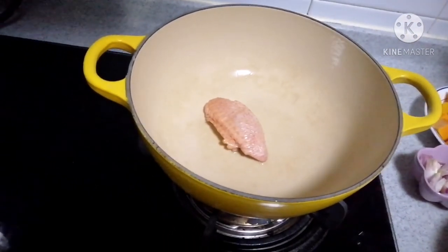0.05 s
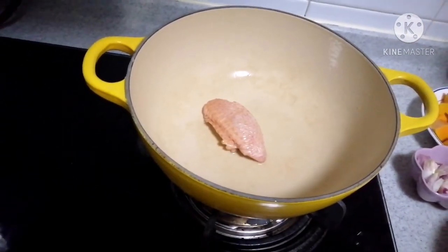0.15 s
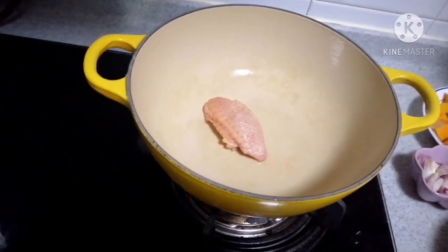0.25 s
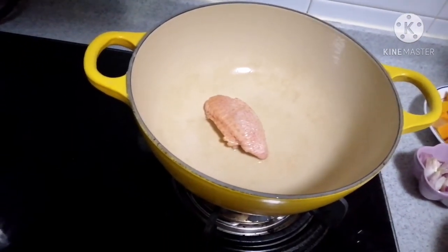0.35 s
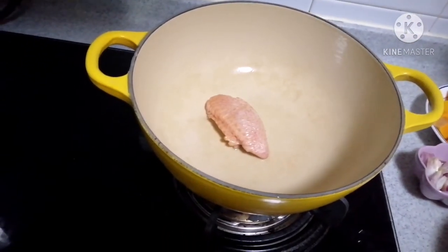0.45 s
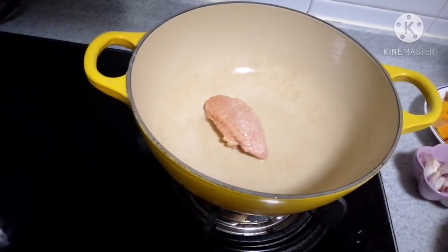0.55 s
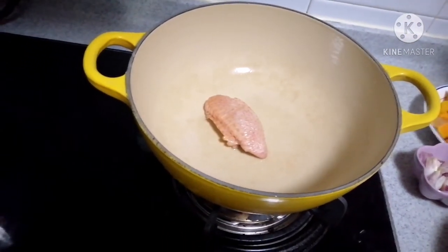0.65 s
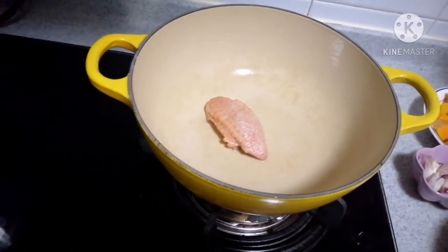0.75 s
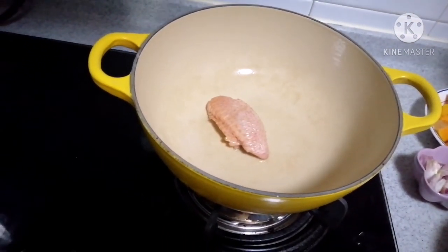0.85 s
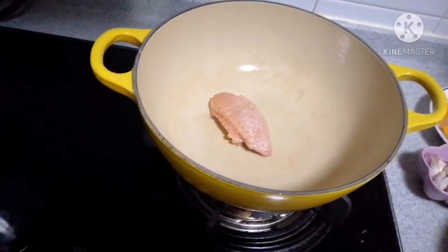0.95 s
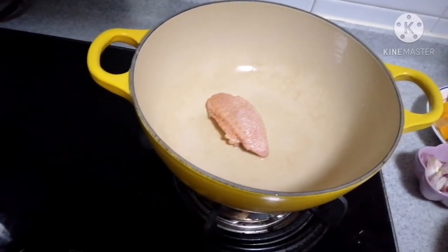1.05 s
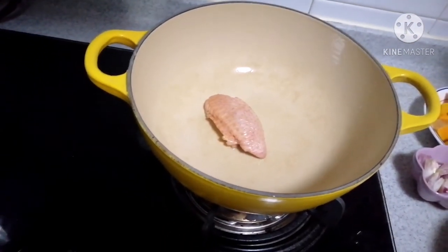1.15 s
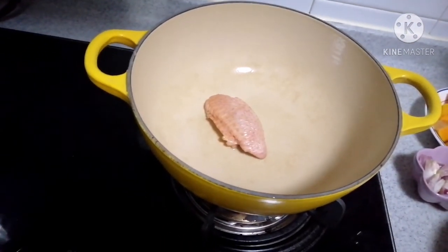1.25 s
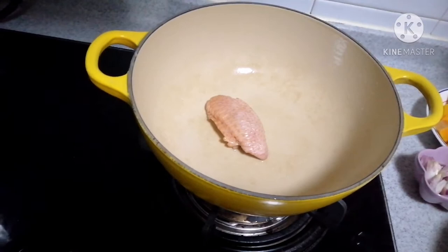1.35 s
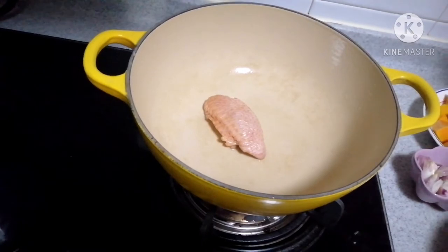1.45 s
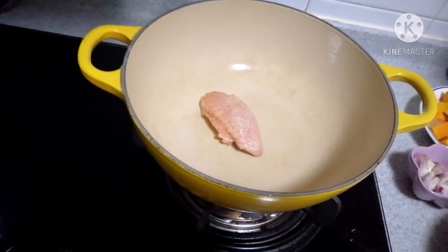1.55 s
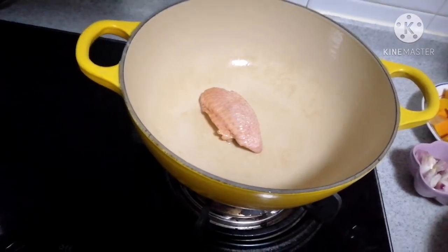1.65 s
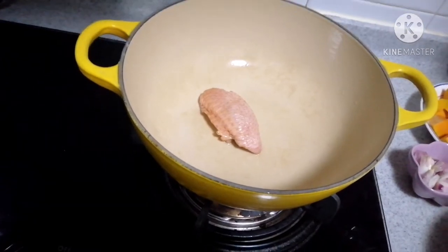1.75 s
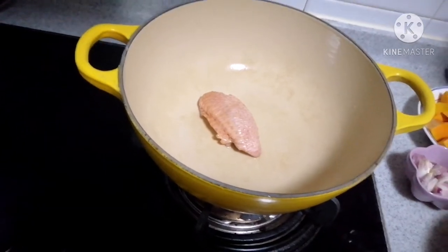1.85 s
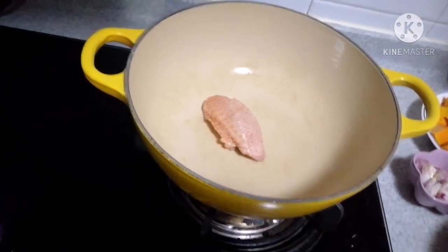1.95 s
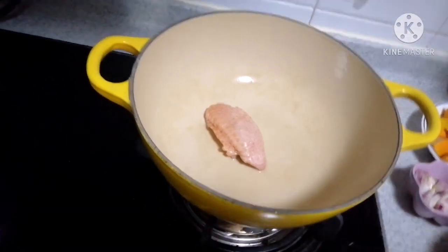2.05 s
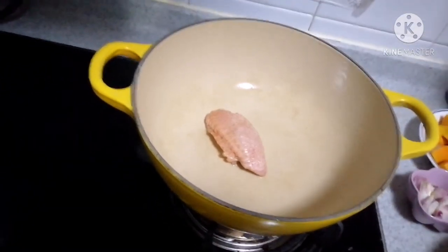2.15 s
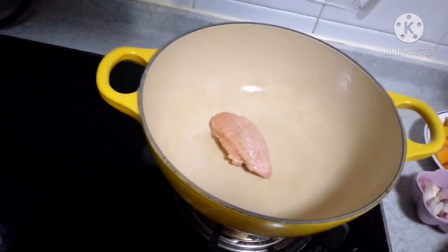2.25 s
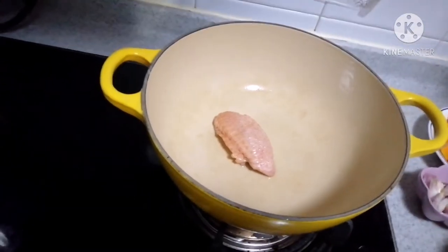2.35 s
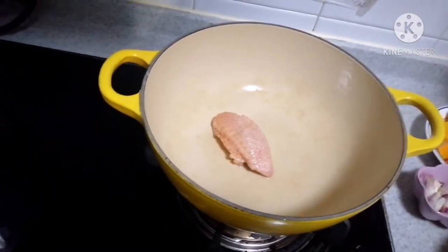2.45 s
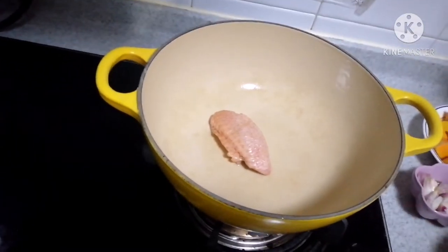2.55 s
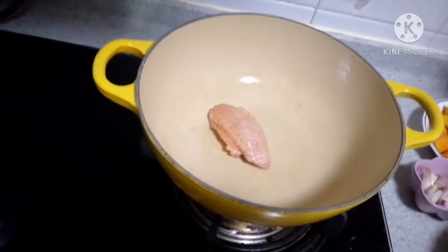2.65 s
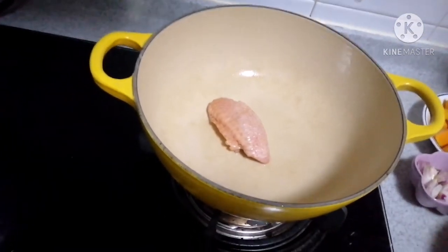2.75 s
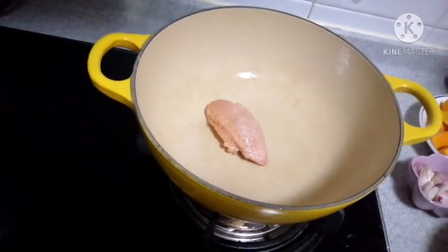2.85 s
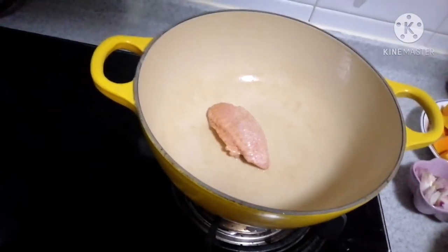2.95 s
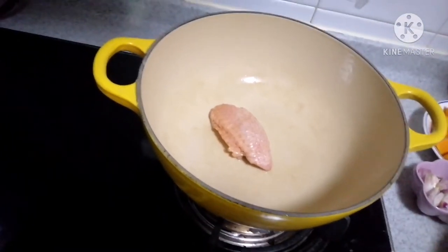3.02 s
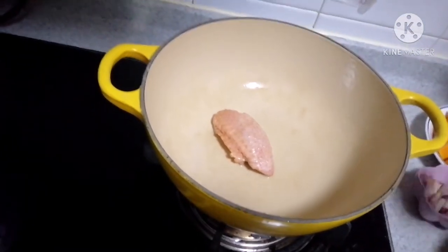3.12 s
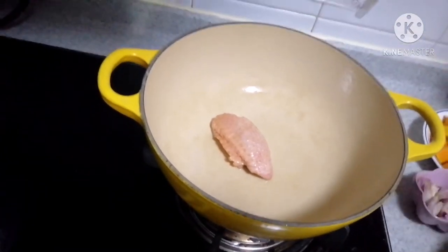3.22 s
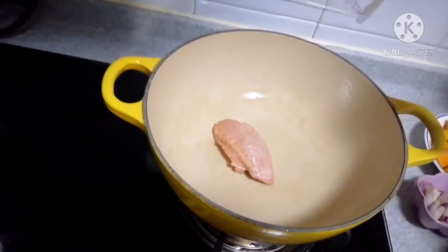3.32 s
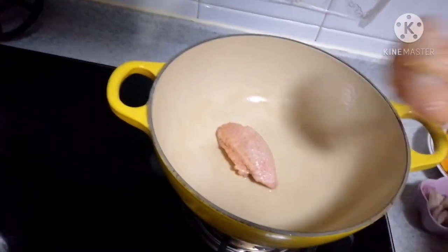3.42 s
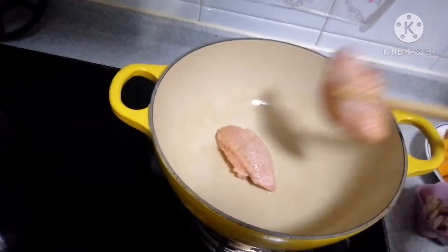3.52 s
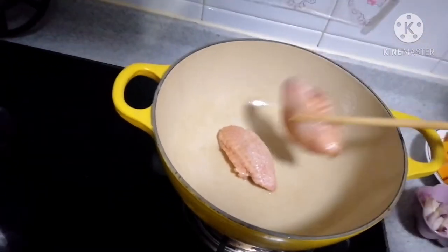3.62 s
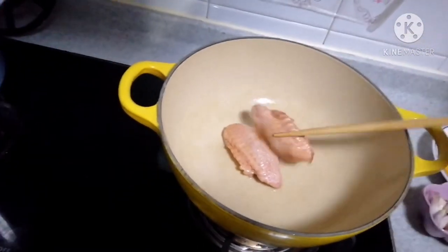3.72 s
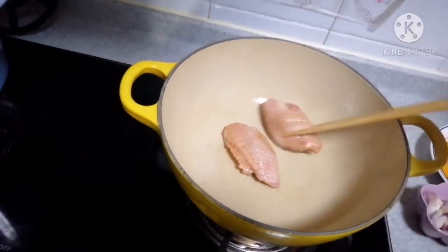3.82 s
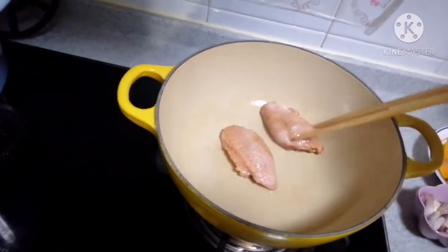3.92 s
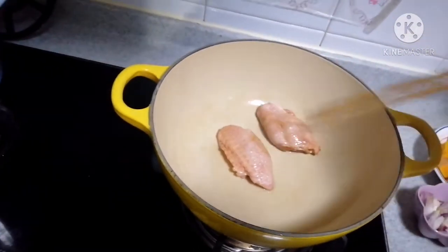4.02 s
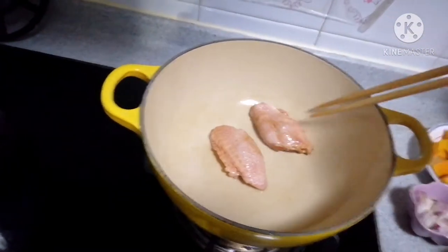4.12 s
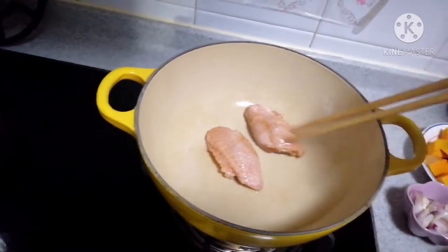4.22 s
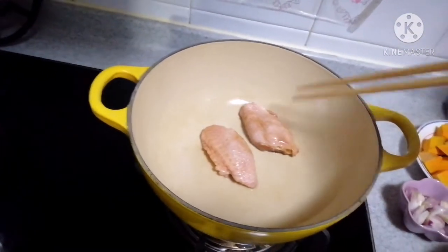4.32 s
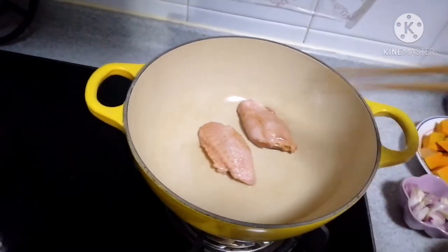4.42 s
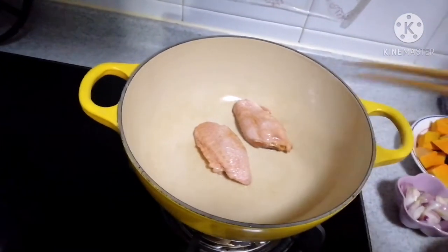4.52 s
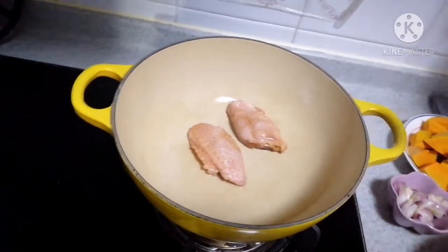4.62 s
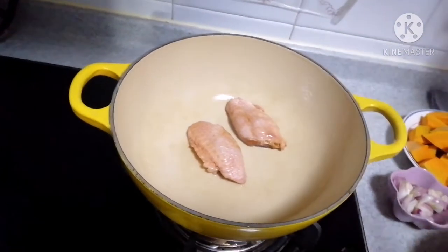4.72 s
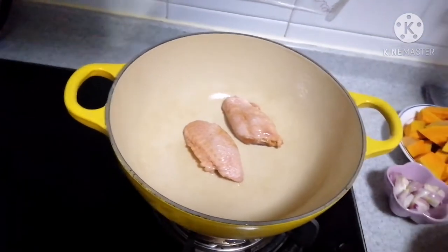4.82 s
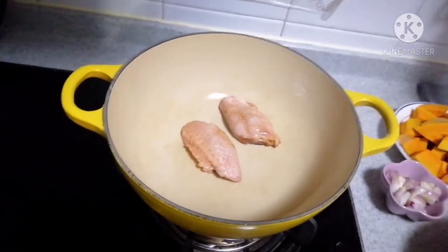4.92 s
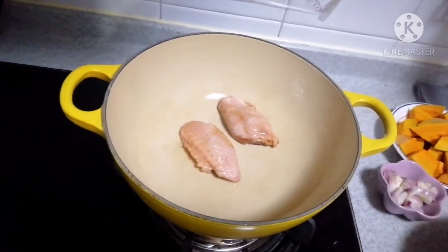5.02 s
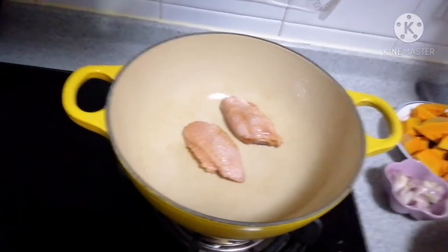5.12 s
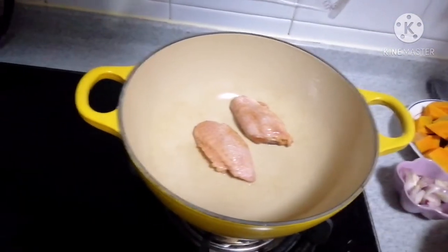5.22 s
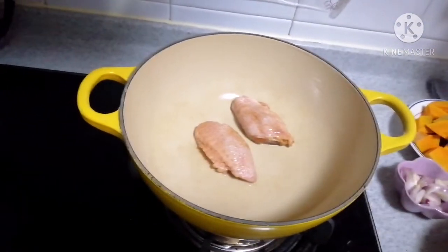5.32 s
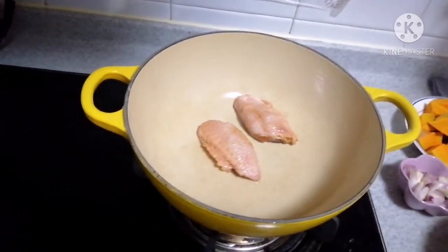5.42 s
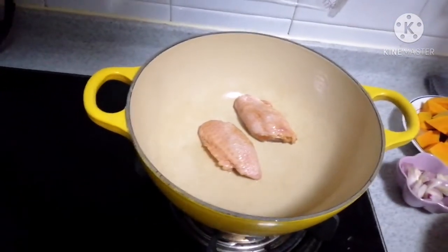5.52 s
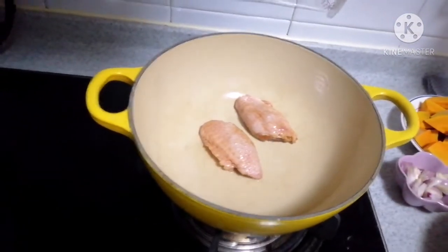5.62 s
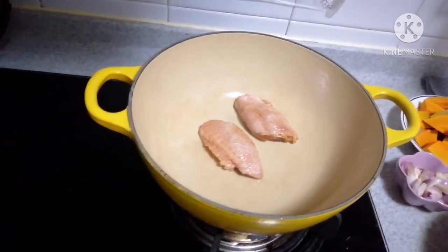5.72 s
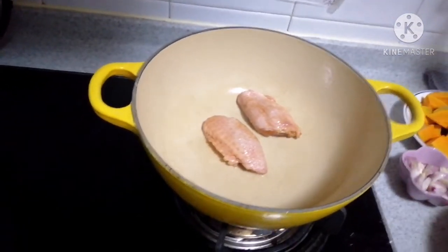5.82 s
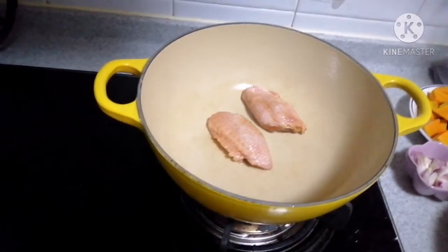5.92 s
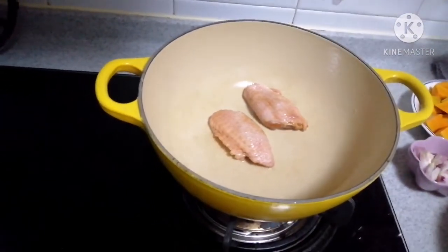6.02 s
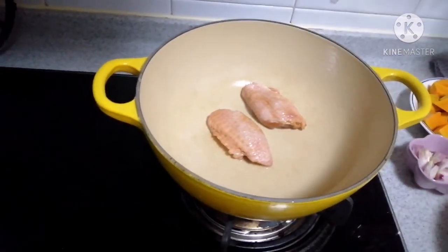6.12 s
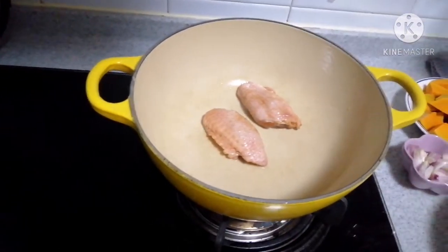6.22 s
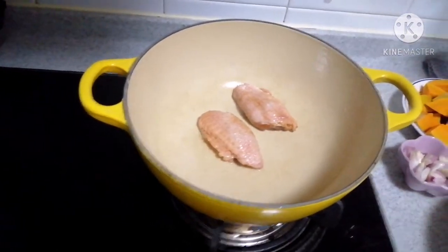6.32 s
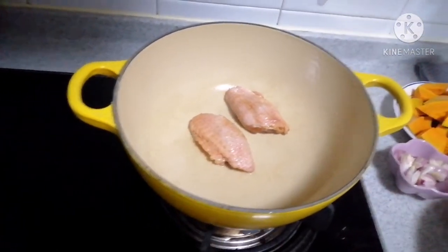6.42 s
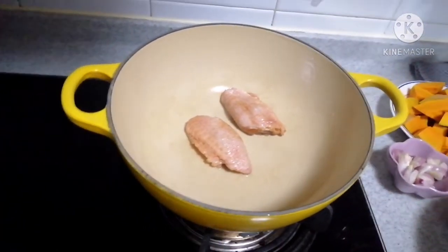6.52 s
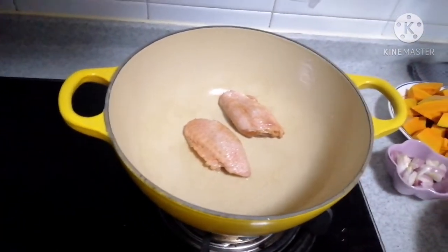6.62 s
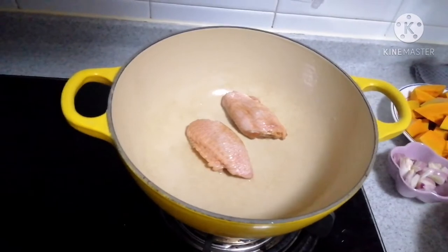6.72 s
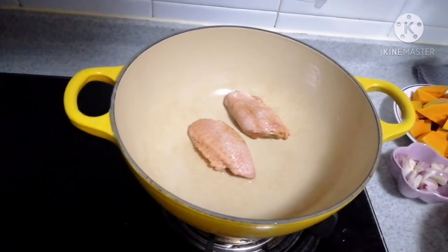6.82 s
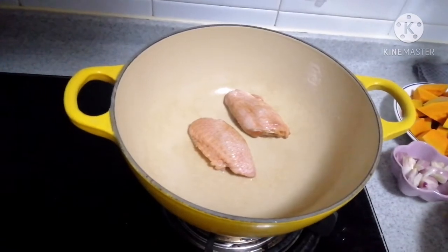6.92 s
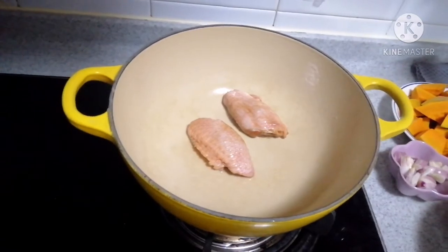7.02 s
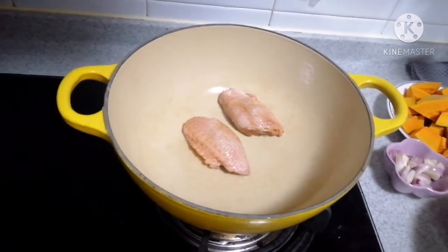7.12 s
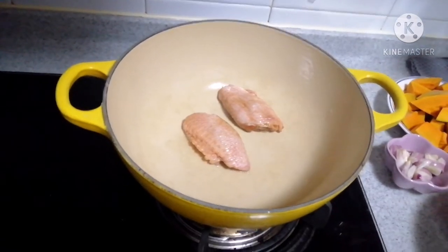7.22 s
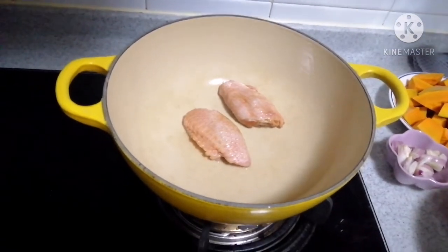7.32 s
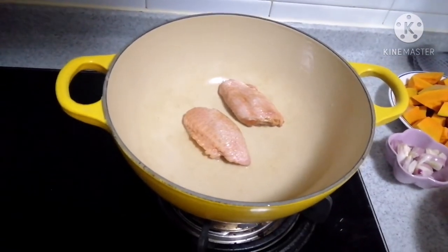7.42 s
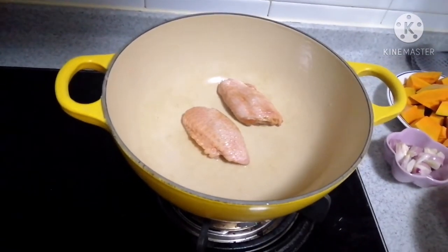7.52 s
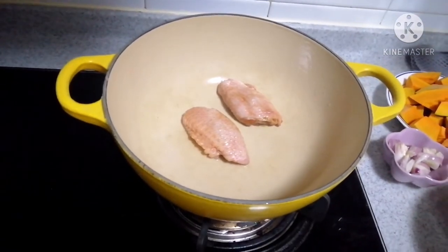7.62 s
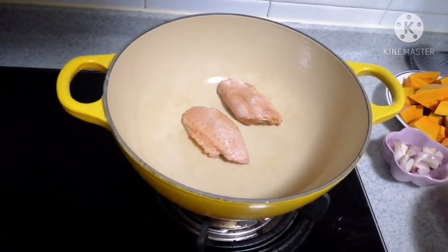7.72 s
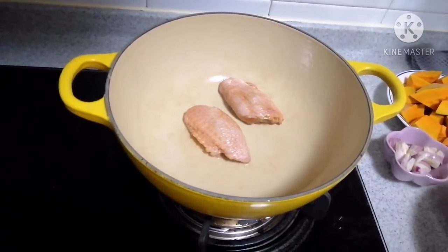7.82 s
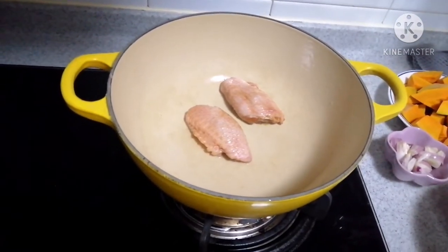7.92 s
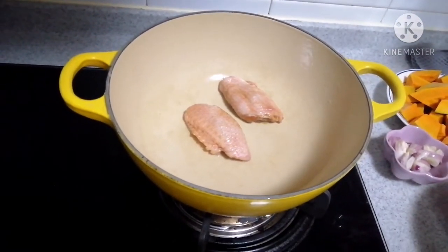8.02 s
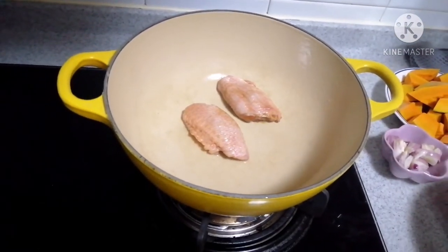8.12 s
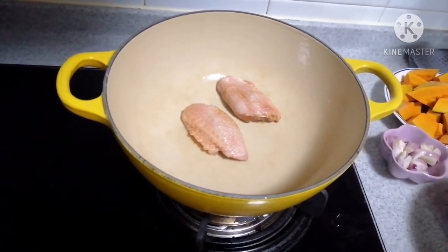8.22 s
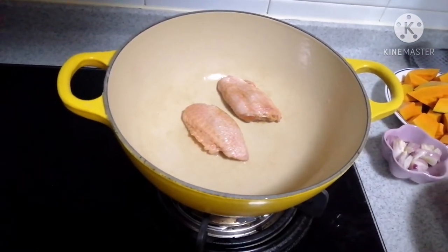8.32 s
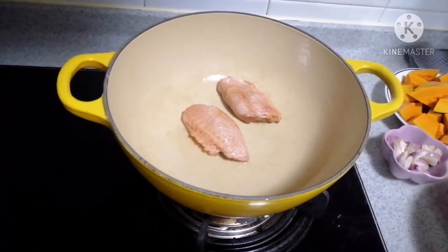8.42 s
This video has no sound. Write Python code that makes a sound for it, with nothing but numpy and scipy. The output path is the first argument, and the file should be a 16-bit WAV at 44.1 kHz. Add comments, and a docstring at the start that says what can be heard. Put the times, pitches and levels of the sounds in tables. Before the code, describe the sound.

A close stereo take in a small home kitchen, with a short, hard echo from a heavy enamelled bowl-shaped pot. From 0 to 3.8 seconds one piece of chicken fries in thin oil: a clumpy, uneven crackle, busy with dry snapping spits, a strong pop near 0.6 and another near 2.1, and small hollow plops ringing low on the pot wall. At about 3.8 a second piece is laid in; the sizzle flares, high and fine at first, then fills out with larger bubbles into a denser, more even frying hiss by 5 seconds. A quick faint double clink of glazed ware comes at 5.26. Fewer loud pops stand out, around 5.5, 6.5, 6.9 and 7.0; the level dips briefly near 6.2. Plops cluster near 8.2. A soft low gas flame rumble wavers underneath throughout, and frying continues to the end at 8.5.

```python
"""In a kitchen, chicken fries in a thin layer of oil in a heavy enamelled pot; a second piece is laid in.
Steam bubbles burst under the meat: random pulses excite short damped sines that echo in the bowl and ring its wall.
Louder spits and low plops join in, something hard clinks nearby, and the gas flame rumbles as filtered noise.
The whole level dips briefly three times; a gain control ducks after loud peaks."""
import sys
import numpy as np
from scipy import signal
from scipy.fft import rfft, irfft, next_fast_len
from scipy.io import wavfile
from scipy.ndimage import uniform_filter1d

SR = 44100
rng = np.random.default_rng(int(sys.argv[2]) if len(sys.argv) > 2 else 0)


def pcm_store(signal):
    """Save signal as 16-bit PCM."""
    levels = np.round(np.clip(np.atleast_2d(signal), -1, 1) * 32767)
    wavfile.write(sys.argv[1], SR, levels.astype(np.int16).T)


N = 373086
SIZE = next_fast_len(N + SR)   # transform length, with room for the tails
HZ = np.maximum(np.fft.rfftfreq(SIZE, 1 / SR), 1)
DELAY = np.exp(-2j * np.pi * HZ / SR)   # spectrum of a one-sample delay


def from_db(db):
    """Logarithmic level: 20 dB is a factor of ten in amplitude."""
    return 10 ** (np.asarray(db) / 20)


def rms_one(x):
    """Normalization: divides a signal by its root-mean-square value."""
    return x / np.sqrt(np.mean(np.abs(x) ** 2) + 1e-20)


def in_time(rows):
    """Linear interpolation: gives each column of a curve table a value at every sample."""
    s, *columns = np.transpose(rows)
    return [np.interp(np.arange(N) / SR, s, column) for column in columns]


def on_grid(points):
    """Interpolation on a logarithmic frequency axis: reads a (Hz, value) table at every bin."""
    hz, values = np.array(points).T
    return np.interp(np.log(HZ), np.log(hz), values)


def colouring(colour):
    """Spectral shaping: turns a spectrum in dB into gains of mean power one."""
    return rms_one(from_db(on_grid(colour)))


def causal(gain):
    """Minimum phase: folding the cepstrum gives a filter of this magnitude that never sounds early."""
    cepstrum = irfft(np.log(gain + 1e-9), SIZE)
    cepstrum[1:SIZE // 2] *= 2
    return np.exp(rfft(cepstrum[:SIZE // 2], SIZE))


def drift(rate_hz):
    """Low-passed noise: slow random wandering of rms one, computed at every 40th sample."""
    pole = np.exp(-80 * np.pi * rate_hz / SR)
    noise = rng.standard_normal(N // 40 + 2002)
    slow = signal.lfilter([1], [1, -2 * pole, pole * pole], noise)[2000:]
    return np.interp(np.arange(N) / 40, np.arange(len(slow)), rms_one(slow))


def ring(hz, t60):
    """Damped resonance: spectrum of a sine that starts at height 1 and falls 60 dB in t60 seconds."""
    radius = from_db(-60 / (t60 * SR))
    angle = 2 * np.pi * min(hz, .45 * SR) / SR
    return np.sin(angle) * DELAY / (1 - 2 * radius * np.cos(angle) * DELAY + (radius * DELAY) ** 2)


def sides(pan_db):
    """Intensity stereo: left and right gains from a left-right level difference."""
    return from_db(np.multiply.outer([.5, -.5], pan_db))


# Sizzle of the piece already in the pot. Each row: time in seconds, level of the bursts in dB,
# lift of the commonest bubble size in dB, lift of the large bubbles in dB.
FIRST_CURVE = [(0.0, -44.5, 8.5, -0.5), (0.2, -47.5, 2, -3), (0.45, -47, 4.5, -3), (0.7, -50, 4.5, 6.5),
               (0.88, -49, 5, 2.5), (0.97, -47.5, 1.5, -2), (1.15, -49.5, 4, 2.5), (1.4, -46.5, 2, 0.5),
               (1.75, -48, 1, 3), (2.05, -50.5, 4, 2), (2.15, -46.5, 1, -4), (2.32, -52, 5.5, 4),
               (2.6, -48, 2.5, 0.5), (2.95, -47, 0.5, 5), (3.3, -48, 0, 2.5), (3.55, -52, -2.5, 3),
               (3.7, -45, 5, 0.5), (3.76, -51.5, 3, -1.5), (3.8, -44.5, 8, -7), (3.9, -47.5, 1.5, -6)]
# Spectrum of this sizzle, also of the spits. Each row: frequency in Hz, relative density in dB per Hz.
FIRST_SPECTRUM = [(240, -34), (400, -18.5), (620, -14.5), (689, -4), (778, -8), (878, -12.5), (932, -17),
                  (1400, -9), (1870, -11.5), (2210, -2), (3370, -1), (5800, -1.5), (6350, -3), (7500, 1),
                  (8300, -0.5), (9270, 4), (11500, -2), (14800, -18)]
FIRST_WALL_DB, SECOND_WALL_DB = 1, -4   # the wall rings less under the second piece


def first_piece():
    """Shot noise: strongly clumped bursts from meat laid in before the start."""
    return sizzle(FIRST_CURVE, laid_s=-2.5, pan_db=1.5, lean=0.092, wall_gain=wall(FIRST_WALL_DB), fine_db=-5,
                  colour=FIRST_SPECTRUM, per_s=8000, size_db=4.0, cycles=4.6, clump_db=1.8, patchy_db=2.2)


# Sizzle of the piece laid in: it flares up, then settles. Each row: time in seconds, level of the bursts
# in dB, lift of the commonest bubble size in dB, lift of the large bubbles in dB.
SECOND_CURVE = [(3.79, -56, .5, .5), (3.85, -46.5, 1.1, 1), (4.0, -44.5, 2.2, 1.5), (4.2, -46.5, 5.6, 3.1),
                (4.32, -43.5, 7.7, 5.4), (4.44, -43, 5.8, 4.2), (4.62, -46.5, 7, 4.6), (4.9, -45.5, 3, 1.2),
                (5.2, -43.5, 1.1, 0.53), (5.35, -42.5, 3.4, .1), (5.55, -44.5, 2.4, 0.74),
                (5.8, -43.5, 2, 1.9), (6.15, -43.5, 1.3, 1.6), (6.4, -42, 0.56, .5),
                (6.7, -43.5, 0.63, 0.46), (7.0, -44, .5, 0.36), (7.06, -42, 1.8, 0.73),
                (7.4, -43.5, 1.8, 1.2), (7.8, -44, 1.1, 2.1), (8.15, -43.5, 1.3, 2), (8.46, -44, 1.3, 0.82)]
# Spectrum of this sizzle. Each row: frequency in Hz, relative density in dB per Hz.
SECOND_SPECTRUM = [(240, -46), (420, -22.5), (520, -13.5), (635, -8.5), (721, -7), (780, -9), (880, -11),
                   (937, -20.5), (1100, -10.5), (1360, -7.5), (1810, -10), (2250, -6), (2600, -2),
                   (2900, -1.5), (3250, -4.5), (3620, -2), (5500, -2.5), (6050, -6), (6550, -6.5),
                   (7400, -3.5), (8460, -8.5), (9200, -6), (10800, -8), (14800, -21.5)]


def second_piece():
    """Shot noise: a denser, more even stream of bursts with longer rings from the fresh meat."""
    return sizzle(SECOND_CURVE, laid_s=3.83, pan_db=2.2, lean=-0.74, wall_gain=wall(SECOND_WALL_DB), fine_db=-2.26,
                  colour=SECOND_SPECTRUM, per_s=9000, size_db=3.4, cycles=10.6, clump_db=0.22, patchy_db=1.4)


# Fresh meat gives small bubbles: the commonest pitch sinks with age and the large bubbles grow in.
FRESH_HZ, SETTLED_HZ, SINK_S = 5400, 2720, 0.97
LARGE_MISSING_DB, LARGE_SETTLED_DB, GROW_S = -25, 2.5, 0.44


def sizzle(curve, laid_s, pan_db, lean, wall_gain, fine_db, colour, per_s, size_db, cycles, clump_db, patchy_db,
           count=20):
    """Shot noise through resonators: random bursts ring a few cycles, each pitch from a spot of its own."""
    level_db, lift_db, large_db = in_time(curve)
    age = np.maximum(np.arange(N) / SR - laid_s, 0)
    large_db = large_db + LARGE_SETTLED_DB + LARGE_MISSING_DB * np.exp(-age / GROW_S)
    common_hz = SETTLED_HZ + (FRESH_HZ - SETTLED_HZ) * np.exp(-(age / SINK_S) ** 2)

    rate = per_s * from_db(clump_db * (.3 * drift(4.9) + drift(40.0)))   # bursts come in clumps
    sizes = from_db(size_db * np.minimum(rng.exponential(1, N), 4.5))
    sizes = sizes * rng.choice([-1, 1], N)
    happens = rng.random(N) < rate / SR
    bursts = rms_one(sizes * happens) * from_db(level_db) * (age > 0)

    dealt = rng.integers(0, count, N)   # which pitch each burst excites
    both_ears = EARS[0].mean(axis=0) + np.abs(EARS[1]).mean(axis=0)
    out, power = 0, 0
    for k, hz in enumerate(np.geomspace(600, 14000, count)):
        pip = ring(hz, cycles / hz)
        pip = pip / np.abs(pip).max()
        power = power + np.abs(pip) ** 2 / count
        heard = pip * pot_path()
        # every spot comes through equally loud
        heard = heard * np.linalg.norm(pip * both_ears) / np.linalg.norm(heard.mean(axis=0))
        # large bubbles ring low, fine spray high
        lowness = np.clip(np.log2(2800 / hz), 0, 1)
        highness = np.clip(np.log2(hz / 5500) * 2, 0, 1)
        mix_db = lowness * large_db + highness * fine_db
        mix_db = mix_db + lift_db * np.exp(-(np.log2(hz / common_hz) / 0.24) ** 2)
        mix_db = mix_db + patchy_db * (0.64 * drift(2.4) + drift(15.4))
        out = out + rfft(bursts * (dealt == k) * from_db(mix_db), SIZE) * heard
    shape = causal(colouring(colour) / np.sqrt(power))   # allows for the rings' own spectrum
    # lean: left-right dB per dB of lift
    return sides(pan_db + lean * lift_db) * irfft(out * wall_gain * shape, SIZE)[:, :N]


# The loudest spits of oil. Each row: start in seconds, level of the snap in dB before the pot, pitch in Hz,
# level of its dull body in dB before the pot, left-right difference in dB.
LOUD_SPITS = [(0.0676, -20, 6900, -43, -1.0), (0.123, -26, 5990, -44, -2.5), (0.1476, -23, 4530, -33, 0.5),
              (0.2234, -26, 5560, -50, -0.5), (0.3217, -27, 6120, -45, 2.5), (0.3503, -25, 9020, -55, -1.5),
              (0.3583, -26, 5810, -56, 1.5), (0.3879, -22, 5930, -52, 2.0), (0.401, -26, 7810, -51, -1.5),
              (0.4471, -27, 7540, -55, -3.0), (0.4691, -26, 6900, -40, 2.5), (0.5525, -26, 5200, -38, -1.0),
              (0.5648, -15, 5140, -24, -1.0), (0.6326, -29, 2510, -42, 1.5), (0.6765, -26, 7080, -52, 0.5),
              (0.7918, -27, 4120, -38, 0.0), (0.841, -28, 7340, -47, 0.5), (0.918, -25, 4490, -54, 3.5),
              (0.9281, -26, 6400, -53, 1.0), (0.9489, -25, 5360, -44, 0.0), (0.9585, -25, 6880, -42, 3.0),
              (0.9699, -22, 6980, -53, 0.5), (1.0096, -26, 7380, -56, -2.5), (1.047, -28, 5220, -58, -0.5),
              (1.071, -27, 5500, -55, 0.5), (1.0832, -23, 4990, -43, 1.0), (1.1722, -22, 4690, -50, 1.5),
              (1.2017, -28, 8250, -54, -2.5), (1.2803, -26, 5350, -40, -1.5), (1.2932, -23, 6890, -48, 1.5),
              (1.3352, -24, 5910, -40, -0.5), (1.3912, -24, 8860, -53, -3.5),
              (1.4214, -28, 8650, -54, -0.5), (1.4805, -26, 7650, -57, 2.0), (1.5008, -27, 3200, -40, -1.0),
              (1.5638, -28, 4030, -45, 3.5), (1.5904, -25, 5280, -45, 1.0), (1.7097, -23, 4030, -42, 4.0),
              (1.8148, -28, 7930, -55, -0.5), (1.8502, -29, 9970, -55, 5.0), (1.8861, -26, 6570, -44, -1.0),
              (1.911, -30, 10060, -54, 6.0), (1.9664, -29, 6800, -56, -1.5), (1.9862, -29, 5740, -57, 4.5),
              (2.0267, -27, 5870, -43, 0.5), (2.0812, -25, 8650, -55, -3.0), (2.1016, -27, 4930, -37, 1.0),
              (2.1107, -17, 4570, -29, -2.0), (2.1388, -23, 8410, -50, 1.5), (2.1691, -19, 6560, -40, -3.5),
              (2.1991, -23, 4290, -46, 4.5), (2.2123, -24, 6240, -44, 2.5), (2.2659, -28, 9130, -59, -4.0),
              (2.3078, -30, 8840, -57, 2.0), (2.3508, -28, 4740, -38, -2.5), (2.3751, -27, 7740, -50, -3.5),
              (2.3866, -24, 7970, -55, -4.5), (2.4119, -27, 5970, -43, -0.5),
              (2.4451, -24, 7250, -45, -1.0), (2.4619, -26, 6110, -58, 1.0), (2.5067, -29, 4670, -51, 0.5),
              (2.5545, -21, 5510, -44, -2.5), (2.6021, -22, 5040, -39, -1.0),
              (2.6161, -24, 6060, -43, -1.5), (2.6311, -22, 6610, -38, -1.0),
              (2.6851, -23, 6350, -38, -2.0), (2.6965, -23, 6890, -38, -1.0), (2.7884, -23, 4890, -43, 0.5),
              (2.846, -26, 5070, -36, -1.5), (2.8794, -26, 5730, -48, 1.5), (2.9301, -22, 8070, -53, 2.0),
              (2.9394, -24, 6390, -48, -0.5), (2.9737, -28, 7040, -50, 1.0), (3.0532, -24, 3400, -35, 4.0),
              (3.1132, -23, 6070, -40, 2.5), (3.1288, -25, 7710, -54, 0.0), (3.1653, -27, 9290, -56, 0.5),
              (3.1741, -28, 6300, -43, -2.0), (3.2198, -25, 8900, -54, 2.0), (3.2525, -28, 9470, -52, 1.5),
              (3.3087, -28, 9910, -45, 1.5), (3.3322, -29, 6010, -55, -0.5), (3.3593, -23, 6520, -56, 1.0),
              (3.4033, -23, 5980, -44, 3.0), (3.4677, -29, 5480, -59, 1.0), (3.4826, -26, 7840, -53, 1.0),
              (3.5051, -28, 9520, -58, 3.5), (3.5278, -27, 9120, -57, -6.5), (3.5645, -23, 3240, -44, 4.5),
              (3.6058, -30, 6050, -57, -3.5), (3.6192, -27, 6940, -47, -5.0), (3.628, -26, 6830, -56, -4.0),
              (3.6525, -27, 5270, -41, 0.0), (3.6913, -25, 5780, -37, -1.5), (3.7083, -25, 6550, -54, -1.0),
              (3.7234, -22, 6630, -43, -1.0), (3.7721, -24, 5650, -48, 3.0), (3.7874, -22, 7230, -55, -3.5),
              (3.8329, -21, 4170, -48, -3.5), (3.8481, -23, 5070, -46, -2.5),
              (3.8705, -19, 5270, -35, -2.5), (4.0627, -22, 5070, -45, -5.0),
              (4.2093, -21, 5300, -45, -3.0), (4.2188, -20, 5080, -38, -4.0),
              (4.2864, -20, 5120, -47, -3.5), (4.2992, -21, 4710, -48, -1.5),
              (4.4434, -21, 5170, -42, -4.0), (4.5288, -18, 5210, -43, -3.5),
              (4.6275, -22, 4510, -34, -5.0), (4.7039, -20, 4260, -39, -7.0),
              (4.8112, -20, 4960, -47, -5.5), (4.8418, -22, 6230, -50, -2.5),
              (5.0776, -19, 6100, -35, -2.0), (5.1439, -23, 4970, -48, -1.5),
              (5.4628, -20, 4580, -34, -2.5), (5.4832, -17, 4080, -33, -4.0),
              (5.9944, -18, 4100, -36, -1.0), (6.2243, -20, 7160, -41, 1.0), (6.5365, -17, 7070, -45, 0.5),
              (6.905, -17, 4090, -32, -1.5), (6.9658, -22, 5380, -47, -1.0), (7.0421, -17, 4140, -34, 1.5),
              (8.373, -20, 3400, -38, -1.0)]
THUD_HZ, SPIT_TAIL_DB = 1400, -2   # pitch of the dull body; level of the echo tails


def spits():
    """Impulsive excitation: each spit is a coloured snap with a duller body under it."""
    rows = LOUD_SPITS + small_spits()
    snap_rows = [(s, db, hz, pan_db) for s, db, hz, _, pan_db in rows]
    thud_rows = [(s, db, THUD_HZ) for s, _, _, db, _ in rows]
    snaps = pops(snap_rows, cycles=5.0, rise_cycles=.05, crack_db=-3, tail_db=SPIT_TAIL_DB)
    thuds = pops(thud_rows, cycles=2.9, rise_cycles=0.16, crack_db=-30, tail_db=SPIT_TAIL_DB)
    return snaps * causal(colouring(FIRST_SPECTRUM)) + thuds


SMALL_SPITS_PER_S, SMALL_SPIT_DB, SMALL_SPIT_SPREAD_DB = 40, -38, 4
SMALL_SPIT_HZ, SMALL_SPIT_PAN_DB = (2840, 10700), (5, -4)   # ranges of pitch and of left-right dB
SMALL_THUD_DB = -21   # body against its snap


def small_spits():
    """Poisson process: rows of lesser spits, their pitches spread evenly in octaves."""
    s, level_db, size, place = scattered(SMALL_SPITS_PER_S, SMALL_SPIT_DB, SMALL_SPIT_SPREAD_DB)
    (low, high), (pan_from, pan_to) = SMALL_SPIT_HZ, SMALL_SPIT_PAN_DB
    hz = low * (high / low) ** size
    pan_db = pan_from + (pan_to - pan_from) * place
    return list(zip(s, level_db, hz, level_db + SMALL_THUD_DB, pan_db))


# Larger bubbles, strong and faint, at set times. Each row: start in seconds, level in dB before the pot,
# pitch in Hz.
PLOPS_AT_SET_TIMES = [(0.09, -31, 2330), (0.092, -40, 1120), (0.146, -50, 700), (0.148, -38, 1400),
                      (0.286, -25, 2230), (0.5425, -30, 2320), (0.554, -33, 2320), (0.565, -28, 2120),
                      (0.633, -24, 2200), (0.769, -29, 2200), (1.135, -47, 708), (1.376, -26, 2200),
                      (1.5, -39, 695), (1.646, -33, 1660), (1.862, -31, 1370), (1.923, -41, 740),
                      (2.033, -40.5, 708), (2.111, -28.5, 2310), (2.351, -41, 708), (2.414, -43, 720),
                      (2.58, -42, 860), (2.713, -31, 710), (2.844, -42.5, 710), (3.052, -36.5, 695),
                      (3.053, -33, 1600), (3.29, -39.5, 680), (3.254, -30, 2200), (3.69, -38.5, 710),
                      (4.02, -38.5, 710), (4.266, -38.5, 710), (4.338, -35, 740), (4.336, -30, 2330),
                      (4.483, -33.5, 724), (4.545, -31.5, 700), (4.689, -38, 684), (4.913, -25.5, 2370),
                      (5.521, -32, 1310), (5.544, -28, 2240), (6.601, -35, 1320), (6.904, -34, 695),
                      (7.035, -37, 710), (7.242, -36, 1370), (7.3, -28, 2380), (7.517, -27, 1410),
                      (7.603, -37, 2250), (8.175, -30, 724), (8.197, -52, 705), (8.207, -30.5, 1370),
                      (8.208, -33, 667)]


def plops():
    """Bubble resonance: larger bubbles ring lower and for more cycles, with a gentler onset."""
    return pops(PLOPS_AT_SET_TIMES + small_plops(), cycles=11.0, rise_cycles=.7, crack_db=-30, tail_db=-2)


# Pitches that the small plops favour. Each entry: frequency in Hz.
SMALL_PLOP_HZ = np.array([646, 710, 860, 1370, 1680, 2200, 2330])
SMALL_PLOPS_PER_S, SMALL_PLOP_DB, SMALL_PLOP_SPREAD_DB = 4, -46, 4


def small_plops():
    """Poisson process: rows of faint low bubbles at a few favoured pitches."""
    s, level_db, size, _ = scattered(SMALL_PLOPS_PER_S, SMALL_PLOP_DB, SMALL_PLOP_SPREAD_DB)
    return list(zip(s, level_db, SMALL_PLOP_HZ[(size * len(SMALL_PLOP_HZ)).astype(int)]))


def scattered(per_s, level_db, spread_db):
    """Exponential waiting times: random starts and levels, with two spare draws from 0 to 1."""
    wait, loudness, spare_a, spare_b = rng.random((400, 4)).T
    s = np.cumsum(-np.log(1 - wait) / per_s)
    rows = np.transpose([s, level_db + spread_db * (2 * loudness - 1), spare_a, spare_b])
    return rows[s < N / SR].T


def pops(rows, cycles, rise_cycles, crack_db, tail_db, count=10):
    """Damped oscillation: a crack and a sine that falls 60 dB in the given cycles, sent through the pot."""
    dry = np.zeros((count, 2, N))
    spots = rng.integers(0, count, len(rows))
    t = np.arange(1500) / SR
    for (s, level_db, hz, *pan_db), spot in zip(rows, spots):
        decay = from_db(-60 * t * hz / cycles)
        rise = 1 - np.exp(-t * hz / rise_cycles)
        pip = np.sin(2 * np.pi * hz * t) * decay * rise - from_db(crack_db) * (t == 0)
        at = round(s * SR)
        panned = sides(sum(pan_db))[:, None] * pip   # centred if the row gives no pan
        dry[spot, :, at:at + len(t)] += from_db(level_db) * panned[:, :N - at]
    return sum(rfft(d, SIZE) * pot_path(tail_db) for d in dry)


# Two knocks. Each row: start in seconds, level in dB before the pot, left-right difference in dB.
KNOCKS = [(5.2599, -33.5, -9), (5.2749, -29.5, 1)]
# Modes of the glazed ware. Each row: frequency in Hz, mean level in dB, 60 dB decay time in seconds.
WARE_MODES = [(1480, -41, 0.074), (2980, -22, .03), (4600, -5, 0.035), (5600, -18, .02), (6550, -7, 0.083),
              (7680, -1.5, 0.042), (9400, -12, 0.03), (9140, 5, 0.018), (10500, -5, .02)]
CRACK_DB = -3


def clinks():
    """Modal synthesis: each knock on glazed ware strikes the modes unequally; walls smear the ring."""
    out = 0
    for s, level_db, pan_db in KNOCKS:
        modes = sum(from_db(mode_db + rng.normal(0, 2.5)) * ring(hz, t60) for hz, mode_db, t60 in WARE_MODES)
        start = np.exp(-2j * np.pi * HZ * s)
        out = out + from_db(level_db) * sides(pan_db)[:, None] * (modes + from_db(CRACK_DB)) * start
    return irfft(out * pot_path() * wall(FIRST_WALL_DB), SIZE)[:, :N]


# Spectrum of the flame. Each row: frequency in Hz, relative density in dB per Hz.
FLAME_SPECTRUM = [(12, -30), (20, 7), (31, -2), (54, -6), (75, -8), (114, 2), (147, -3.5), (182, -10.5),
                  (225, -9), (340, -11.5), (365, -8.5), (439, -15.5), (600, -12), (780, -43), (1320, -120)]
# The rumble wavers. Each row: time in seconds, level below 45 Hz in dB, level above 200 Hz in dB.
FLAME_WAVER = [(0, -1, -1.5), (1.8, 1.5, 1), (3.6, -1, -1), (4.2, -6, -1.5), (4.7, -1, 3), (5.2, -2, -1),
               (6, -1, -1), (7, -5, -2), (8.46, 1, -2)]
FLAME_DB = -59
RUMBLE_DIP_S, RUMBLE_DIP_LENGTH_S, RUMBLE_DIP_DB = 5.262, 0.067, -7   # a brief dip near the clinks


def flame():
    """Turbulence noise: random noise shaped to the gas ring's low rumble, wavering in two bands."""
    mid, side = rfft(rng.standard_normal((2, SIZE))) * from_db(on_grid(FLAME_SPECTRUM))
    since = np.arange(N) / SR - RUMBLE_DIP_S
    dipped = (since > 0) & (since < RUMBLE_DIP_LENGTH_S)
    dip_db = RUMBLE_DIP_DB * uniform_filter1d(1. * dipped, size=600)
    deep, upper = 1 / (1 + (HZ / 45) ** 4), 1 / (1 + (200 / HZ) ** 6)
    deep_db, upper_db = in_time(FLAME_WAVER)
    parts = [from_db(db) * irfft(share * stereo(mid, side), SIZE)[:, :N]
             for share, db in [(deep, deep_db), (upper, upper_db), (1 - deep - upper, 0)]]
    return from_db(FLAME_DB + dip_db) * rms_one(sum(parts))


# Low resonances of the pot wall. Each row: frequency in Hz, width in Hz, lift in dB before ring_db is added.
POT_WALL_MODES = [(708, 33, 2.5), (629, 12, -5), (863, 24, -7), (1111, 19, -3.5), (1360, 15, 0)]
POT_LOWEST_HZ = 625


def wall(ring_db):
    """Forced resonance: the wall lifts a few low modes and radiates little below its lowest."""
    lift = sum(from_db(level_db + ring_db) / np.abs(1 + 2j * (HZ - hz) / width) ** 2
               for hz, width, level_db in POT_WALL_MODES)
    return causal((1 + lift) / np.sqrt(1 + (POT_LOWEST_HZ / HZ) ** 6))


BOWL_ECHO_S, BOWL_ECHO_DB = .002, -3.5   # mean delay of the first echo; its level
BOWL_T60_S, BOWL_DB = 0.09, -2
KITCHEN_T60_S, KITCHEN_DB = 0.13, -7


def pot_path(tail_db=0):
    """Reverberation: from a spot on the pot floor to both ears by direct sound, wall echo and decaying tails."""
    t = np.arange(SR // 3) / SR
    build_up = 1 - np.exp(-t / BOWL_ECHO_S)   # tails grow on the time scale of the first echo
    bowl_noise, kitchen_noise = rng.standard_normal((2, 2, len(t))) * build_up
    bowl = from_db(BOWL_DB) * rms_one(bowl_noise * from_db(-60 * t / BOWL_T60_S))
    kitchen = from_db(KITCHEN_DB) * rms_one(kitchen_noise * from_db(-60 * t / KITCHEN_T60_S))
    tails = (bowl + kitchen) * from_db(tail_db) / np.sqrt(len(t))

    left, right = np.zeros((2, len(t)))
    lag = round(SR * rng.uniform(.00001, .00025))   # the left ear is a little farther off
    echoes = (SR * BOWL_ECHO_S * rng.uniform(.86, 1.16, 2)).astype(int)
    left[[lag, lag + echoes[0]]] = 1, from_db(BOWL_ECHO_DB)
    right[[0, echoes[1]]] = 1, from_db(BOWL_ECHO_DB)
    early = np.array([left + right, left - right]) / np.sqrt(2)   # as mid and side
    return stereo(*rfft(tails + early, SIZE))


# Likeness of the two ears. Each row: frequency in Hz, left-right correlation from -1 to 1.
EAR_LIKENESS = [(60, 0.93), (150, 0.97), (380, 0.58), (950, 0.53), (2380, 0.13), (5980, 0.0048),
                (15000, 0.084)]
# Balance of the two ears. Each row: frequency in Hz, left-right difference in dB.
EAR_BALANCE = [(60, -2.5), (110, -2.5), (200, -2), (380, -2), (700, -6.5), (1290, -6.5), (2380, -0.5),
               (4400, -2), (8120, -8.5), (15000, 8)]


def ear_gains():
    """Interaural coherence: the gains of mid and side at each ear set how alike the two are."""
    alike = np.clip(on_grid(EAR_LIKENESS), -1, 1)
    balance = sides(on_grid(EAR_BALANCE))
    return balance * np.sqrt(1 + alike), balance * np.sqrt(1 - alike) * [[1], [-1]]


EARS = ear_gains()


def stereo(mid, side):
    """Mid-side mixing: two ears alike in the bass, nearly unrelated in the treble."""
    return EARS[0] * mid + EARS[1] * side


# The whole level dips briefly. Each row: start in seconds, depth in dB.
LEVEL_DIPS = [(4.845, -1.5), (5.49, -1.5), (6.229, -5)]
DIP_RECOVERY_S = 0.13


def dips():
    """Exponential recovery: a gain that drops at once and creeps back."""
    t = np.arange(N) / SR
    dip_db = sum(depth_db * (t > s) * np.exp(-np.abs(t - s) / DIP_RECOVERY_S) for s, depth_db in LEVEL_DIPS)
    return from_db(dip_db)


def scene():
    """Superposition: both pieces, their spits and plops, the clinks and the flame add linearly."""
    pieces = first_piece() + second_piece()
    bursts = irfft((spits() + plops()) * wall(FIRST_WALL_DB), SIZE)[:, :N]
    return dips() * (pieces + bursts + clinks() + flame())


DUCK_ABOVE_DB, DUCK_SLOPE, RECOVER_DB_PER_S = -27.5, 1, 21   # slope: dB of cut per dB above
TOP, CUTOFF_HZ = .26, 15050   # amplitude at which peaks round off; edge of the treble cut


def record(dry):
    """Gain control: ducks on a loud few milliseconds, recovers steadily; peaks are rounded, the treble cut."""
    power = signal.lfilter([.004], [1, -.996], (dry ** 2).max(axis=0))
    loud_db = 10 * np.log10(power + 1e-12)
    cut_db = DUCK_SLOPE * np.maximum(loud_db - DUCK_ABOVE_DB, 0)
    ramp = RECOVER_DB_PER_S * np.arange(N) / SR
    held_db = np.maximum.accumulate(cut_db + ramp) - ramp   # the cut shrinks at a constant dB rate
    ducked = dry * from_db(-signal.lfilter([.002], [1, -.998], held_db))
    rounded = TOP * np.tanh(ducked / TOP)
    return signal.sosfilt(signal.ellip(10, .5, 55, CUTOFF_HZ, fs=SR, output="sos"), rounded)


dry = scene()
out = record(dry)
pcm_store(out)
```